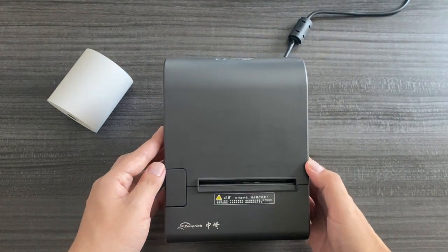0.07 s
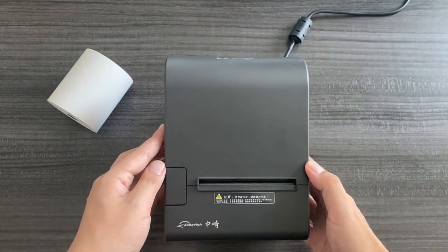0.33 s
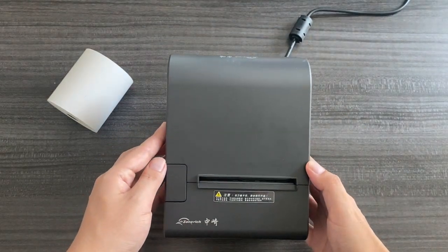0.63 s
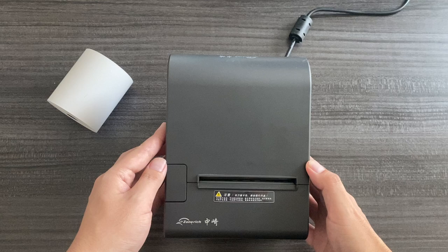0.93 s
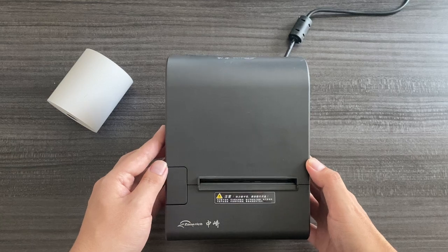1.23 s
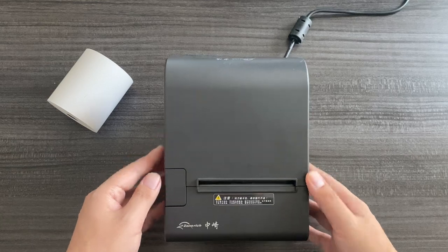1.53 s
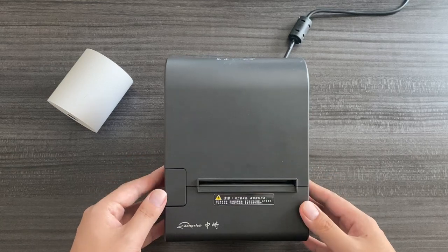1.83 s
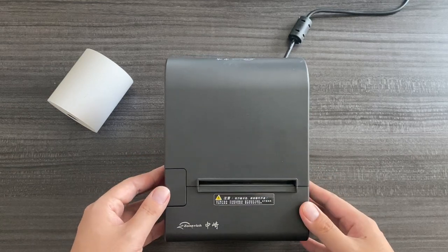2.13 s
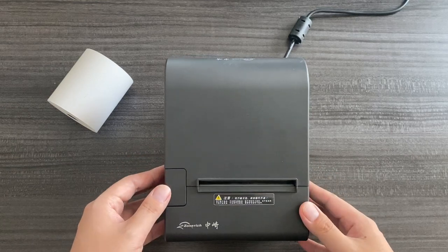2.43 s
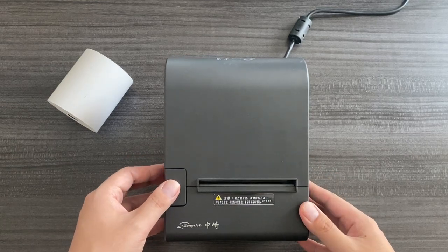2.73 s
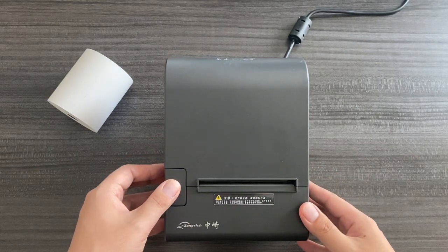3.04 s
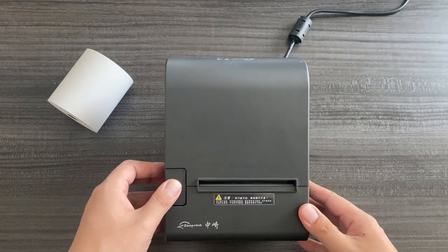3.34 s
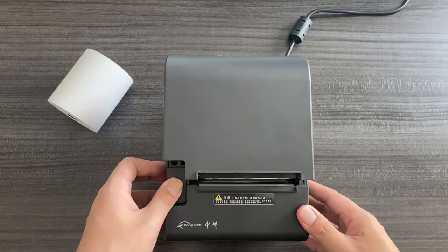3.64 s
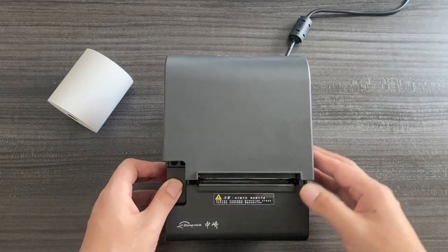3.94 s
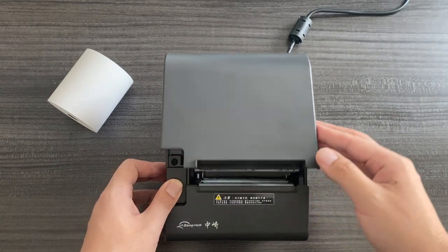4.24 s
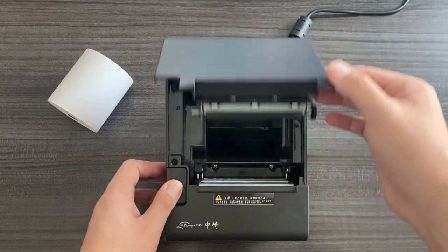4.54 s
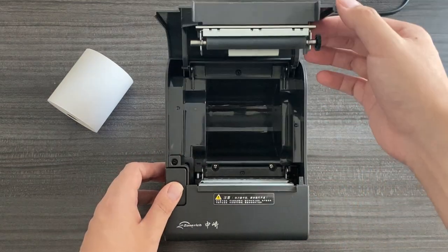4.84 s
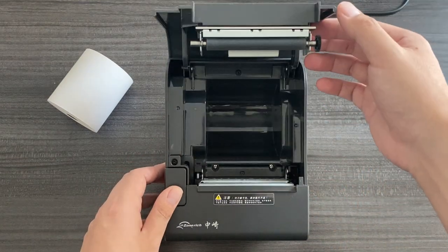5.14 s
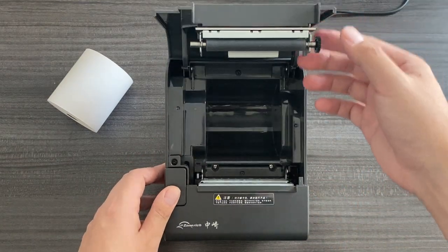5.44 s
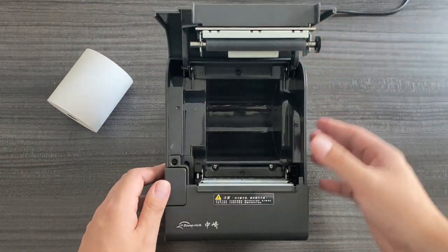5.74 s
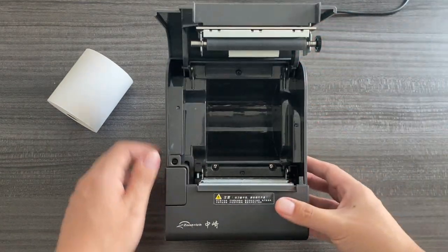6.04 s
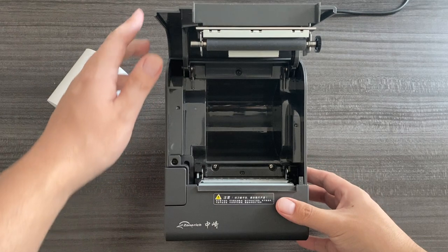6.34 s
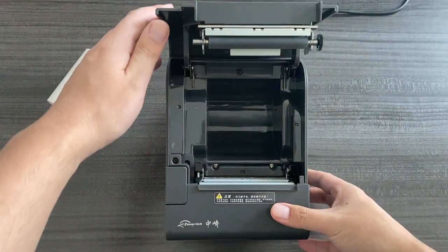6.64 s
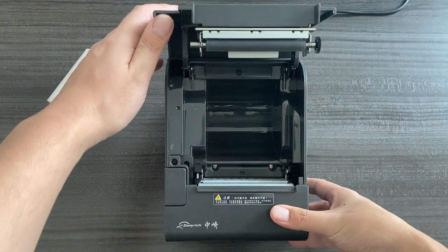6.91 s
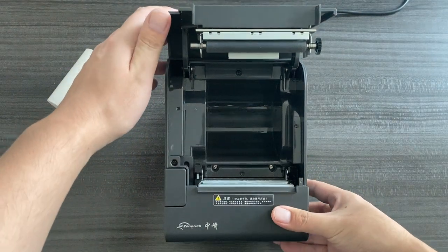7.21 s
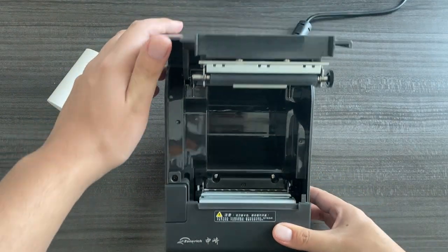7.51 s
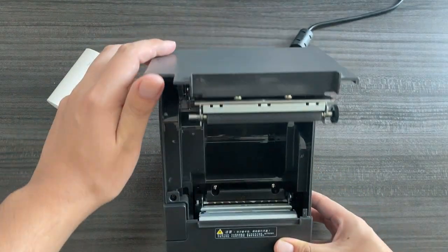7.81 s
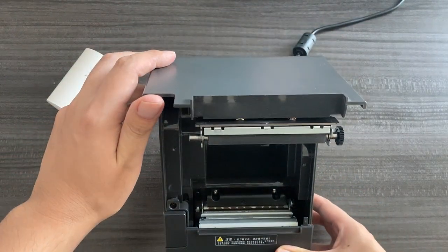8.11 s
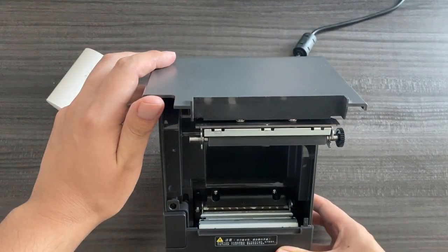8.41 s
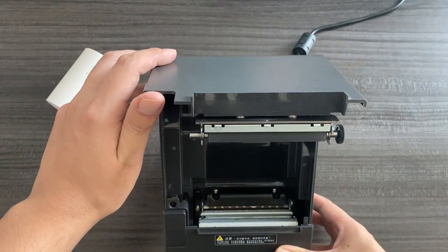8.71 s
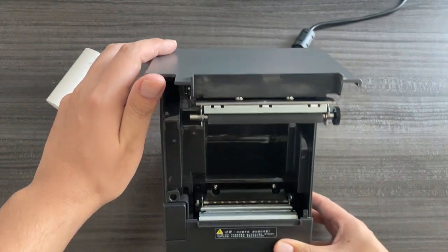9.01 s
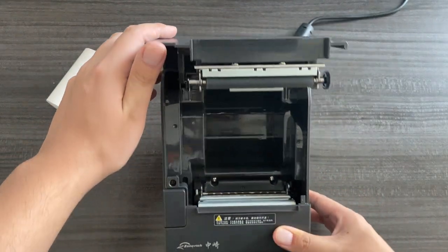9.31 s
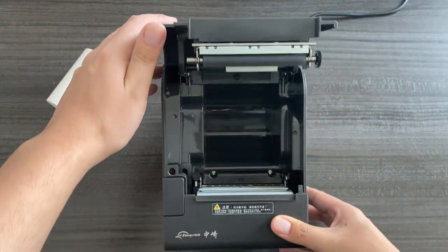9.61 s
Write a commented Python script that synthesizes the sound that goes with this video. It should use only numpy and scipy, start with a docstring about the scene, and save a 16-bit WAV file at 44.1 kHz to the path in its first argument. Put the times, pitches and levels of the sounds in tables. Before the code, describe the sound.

In a small room with a low steady hum, a plastic printer is shifted and set down on a wooden desk with a soft thump. Its latch creaks under pressure, then releases with a loud, hollow snap. The cover swings up with several sharp clicks and clacks against its stop. Quieter knocks, rubbing and hinge creaks follow as it is rocked, all heard from close by.

```python
"""A small room hums quietly, then hands shift a small plastic printer on a wooden desk with a thump.
They press its latch until the cover snaps free, swing the cover up against its stop and rock it on
the hinge. Every contact makes the hollow case ring, and heavy ones shake the desk. Strained parts
stick and slip, so they creak and scrape. Two close microphone openings pick up the sound."""
import sys
import numpy as np
from scipy import signal
from scipy.fft import rfft, irfft, next_fast_len
from scipy.io import wavfile

SR = 44100
rng = np.random.default_rng(int(sys.argv[2]) if len(sys.argv) > 2 else 0)


def store_wav(level_fs):
    """Save 16-bit WAV to argv[1]."""
    pcm = np.round(np.clip(np.atleast_2d(level_fs), -1, 1) * 32767)
    wavfile.write(sys.argv[1], SR, pcm.T.astype(np.int16))


N = 426006

# A "mode" is a note that an object rings at; its "ring time" is how long it takes to fade by 60 dB.
# "Likeness" is how alike left and right are: 0 is unrelated, 1 is the same.
# the tone of the quiet room's noise (frequency [Hz], relative level [dB])
AIR_COLOUR = [(20, -37), (35, -8), (55, 0), (90, -7.5), (140, -5.5), (300, -12.5), (440, -16.5),
              (620, -27.5), (780, -25.5), (1300, -34.5), (2500, -48.5), (4200, -54), (5100, -48),
              (6000, -56.5), (16000, -70.5)]
# the boost of the thin hiss over the rumble (time [s], gain [dB])
HISS_BOOST = [(0, 6), (3, 3.5), (6, 5), (8.2, 0), (9.6, 0)]
# the notes of the hum (frequency [Hz], level [dB])
HUM_NOTES = [(120, -54), (52, -63)]
# how long the room echoes (frequency [Hz], ring time [s])
ECHO_TIMES = [(100, 1), (500, 0.8), (1400, 0.71), (3700, 0.67), (8000, 0.51), (15000, 0.6)]
# how alike both sides are, for room noise and for echoes (frequency [Hz], likeness [0-1])
AIR_LIKENESS = [(30, 1), (400, 0.82), (700, 0), (2000, 0.14), (6000, 0), (7000, 1), (16000, 1)]
ECHO_LIKENESS = [(100, 0.99), (550, 0.72), (1000, 0.15), (3000, 0.15), (5500, 0.38), (7000, 1), (16000, 1)]

# rubbing strokes (time [s], length [s], level [dB])
GRIPS = [(6.45, 0.14, -53), (7.55, 0.39, -56), (9.2, 0.13, -60.5)]  # the hand's grip working against the cover
CREAKS = [(2.85, 0.39, -59), (3.18, 0.3, -52), (4.12, 0.45, -63.5), (4.79, 0.084, -52.5),
          (7.33, 0.078, -54.5), (9.25, 0.46, -69)]  # plastic parts dragging under load
SLIDES = [(2.385, 0.13, -67), (4.81, 0.058, -58.5), (6.79, 0.073, -78), (6.96, 0.15, -83.5)]  # fingers sliding over the case
SCRAPES = [(1.47, 0.31, -78.5), (6.805, 0.03, -70), (6.955, 0.14, -73), (7.5, 0.044, -71.5)]  # gritty scraping of the feet on the desk and of the hinge pins
GROANS = [(4.15, 0.045, -57.5), (6.812, 0.025, -49.5), (7.04, 0.11, -49), (9.33, 0.073, -61)]  # the hinge groaning as the cover turns
SCUFFS = [(4.808, 0.049, -51), (4.884, 0.014, -48), (5.578, 0.035, -54.5), (6.482, 0.038, -62.5),
          (7.255, 0.017, -62.5), (9.319, 0.019, -62), (9.345, 0.041, -74), (9.508, 0.018, -65.5)]  # fingertips brushing the open cover
# the tone of each kind of rubbing (frequency [Hz], relative level [dB])
GRIP_COLOUR = [(40, -27), (110, -2), (250, 2), (400, -10), (700, -21), (2000, -41), (16000, -100)]
CREAK_COLOUR = [(150, -22.5), (350, 7.5), (560, 4), (950, -7), (1400, -20.5), (2500, -23), (5000, -36),
                (16000, -54)]
SLIDE_COLOUR = [(500, 3), (2000, 4), (4500, 0.5), (7500, -7), (11000, -17), (16000, -29)]
SCRAPE_COLOUR = [(500, -3), (2000, 5.5), (5000, -6), (7800, -7), (11300, -4.5), (13000, -13.5),
                 (16000, -18)]
GROAN_COLOUR = [(300, -5), (450, 18.5), (650, 1.5), (850, -0.5), (1100, -2.5), (1400, -7.5), (1650, -9),
                (2000, -7.5), (2800, -19), (3600, -23), (6000, -37), (16000, -27)]
SCUFF_COLOUR = [(200, 3), (600, 1), (1000, 0), (1400, -3), (2000, -7), (3100, -19.5), (6000, -57),
                (16000, -46)]

# modes (frequency before tuning [Hz], relative level [dB], ring time [s])
SWAY_MODES = [(151, 5.5, 0.46), (215.5, -9.5, 0.75)]  # the printer swaying on its rubber feet
DESK_MODES = [(59.6, -12.5, 0.43), (72, -5.5, 0.34), (122.2, 2, 0.19), (155.5, -4.5, 0.25),
              (210.3, -6, 0.19), (247.3, -3.5, 0.26), (302, -8, 0.17), (361.8, -2.5, .16), (447, -10, 0.12),
              (498, -3.5, 0.12)]  # the desk top with the printer on it
CASE_MODES = [(365, -3, 0.12), (470, -2.5, 0.042), (536, -4, 0.39), (677, -16, 0.083), (703, -7, 0.078),
              (773, -8, 0.082), (900, -8, 0.097), (975, -1.5, 0.21), (1010, -4.5, 0.2),
              (1280, -16.5, 0.056), (1450, -3.5, 0.092), (1640, -5, 0.033), (1800, -5.5, 0.077),
              (1954, -4.5, 0.04), (2404, -9, 0.06), (2784, -6.5, 0.04), (3300, -6, 0.085),
              (3535, -3.5, 0.053), (4190, -9, 0.082), (4340, -12, 0.1), (7540, -5.5, 0.076)]  # the clear notes of the hollow case
COVER_MODES = [(343, -8.5, 0.14), (515.6, 1, 0.16), (701, -11, 0.19), (955, -20.5, 0.12)]  # the deep notes of the closed cover
# the overall tone of the case's many crowded modes (frequency [Hz], relative level [dB])
CASE_COLOUR = [(250, 1), (550, 0), (1000, 4), (1300, -1), (1650, 0), (2100, 0.5), (2700, 3.5), (4800, -1),
               (6200, -0.5), (7800, 11.5), (10500, -0.5), (12000, 2.5), (14200, -4), (15300, -2.5)]
# the case's bands, low to high (bottom [Hz], top [Hz], gain [dB], ring time of crowded modes [s],
# likeness [0-1], gain into the room [dB])
CASE_BANDS = [(296.3, 740, -1.5, 0.055, 0.3, -5), (730, 2060, -2.5, 0.063, 0.93, -3),
              (1880, 5230, 0, 0.05, 0.93, -2.5), (5070, 7800, -5.5, 0.016, 0.8, -13.5),
              (9000, 16000, -0.5, 0.029, 1, -10.5)]

# the printer's weight landing on the desk (time [s], level [dB], strongest push at [Hz])
THUMPS = [(1.183, -43, 290), (1.455, -34, 229), (1.463, -32, 128), (3.519, -30, 308), (3.546, -33, 55),
          (3.55, -36.5, 179.8), (4.44, -43.5, 134), (4.584, -38.5, 380), (4.59, -44.5, 142),
          (4.775, -39, 370), (4.823, -40, 127), (6.829, -41.5, 149), (6.968, -39, 152), (7.044, -47, 127),
          (7.512, -41, 129)]
# struck panels and small parts, and two brief high tones at 9.26 s (time [s], level [dB], frequency before
# tuning [Hz], ring time [s])
PINGS = [(1.178, -57, 1830, .05), (1.18, -51, 990, .06), (1.181, -34, 508, 0.056), (1.182, -33, 310, 0.055),
         (1.202, -35, 320, 0.035), (1.179, -79, 3330, .05), (1.449, -47, 1068, .05),
         (1.448, -51.5, 1852, 0.06), (1.448, -61, 2430, 0.034), (1.448, -63, 3280, 0.022),
         (3.308, -40.5, 977, 0.06), (3.503, -34, 890, 0.049), (3.515, -31, 2840, 0.0071),
         (3.514, -30, 937, 0.016), (4.412, -44, 1683, 0.085), (4.411, -40.5, 920, 0.039),
         (4.412, -57, 3150, 0.1), (4.577, -34.5, 1870, 0.023), (4.575, -39.5, 810, 0.063),
         (4.577, -44, 995, .06), (4.577, -34, 530, 0.076), (4.769, -39.5, 810, .06),
         (4.769, -45.5, 1240, 0.033), (4.772, -43, 1480, 0.055), (4.773, -34.5, 355, 0.08),
         (4.846, -52, 3200, 0.037), (4.888, -50, 2070, 0.023), (5.2, -50.5, 2560, 0.023),
         (5.201, -48, 1003, 0.083), (5.586, -48.5, 971, .03), (6.794, -54, 678, 0.025),
         (4.176, -55.5, 720, .06), (6.96, -40, 378, 0.052), (7.113, -46, 670, .05),
         (7.354, -42.5, 809, 0.029), (7.355, -42, 535, 0.23), (9.256, -66, 4290, 0.0056),
         (9.255, -62.5, 2300, 0.0075)]
# contacts that ring the case (time [s], base level [dB], treble slope [dB per octave])
CLICKS = [(1.446, -48, -7.5), (2.855, -52, -11), (3.309, -35.5, -5), (3.487, -42, -6.5), (3.497, -36, -5),
          (3.503, -40, -1.5), (3.5146, -26.5, -1), (3.521, -30, -2.5), (3.538, -43.5, 2.5),
          (3.544, -30.5, -0.8), (3.55, -37.5, -2.5), (3.589, -42, -1.5), (4.056, -50, 0),
          (4.209, -46.5, -5), (4.41, -44.5, 1.2), (4.419, -44, -8), (4.515, -56.5, -1.5),
          (4.574, -33.5, -4), (4.769, -35, -6), (4.823, -48.5, 0), (4.845, -52, -0.5),
          (4.873, -43.5, -14.5), (4.89, -53, -6), (5.199, -40.5, -7.5), (5.282, -53.5, -11),
          (6.502, -68, 0), (6.736, -64, -3), (7.566, -58, 0.5), (7.907, -58.5, -1.4), (9.256, -60.5, -1)]  # hard clicks of the latch, hinge and cover stop
KNOCKS = [(1.179, -50, -9), (1.185, -56, -18), (1.201, -56.5, -15), (1.456, -52.5, -11), (1.557, -65, -1.5),
          (2.93, -54, -3), (3.045, -78, -4), (3.107, -68, -10.5), (3.169, -59, -7.5), (3.206, -58.5, -18),
          (3.236, -61.5, -23), (3.268, -51.5, -13), (3.302, -57, -1.5), (3.335, -59, -13), (3.37, -51, -10),
          (3.468, -50.5, -5.5), (6.794, -60, -14.5), (6.818, -67, -11), (6.829, -66.5, -6),
          (6.955, -57.5, -1.5), (6.961, -54, -11.5), (7.01, -67, -1.5), (7.049, -58, -6.5),
          (7.084, -73, -7), (7.113, -56, -7.5), (7.121, -63, -16), (7.138, -65, -8.5), (7.354, -55, -4.5)]  # the case knocking as it shifts under the hands, and the ticks of parts that slip as they creak
# the sprung latch throwing and catching the cover (time [s], level [dB], wait until the catch [s])
CLUNKS = [(3.5148, -17.5, 0.034), (3.5434, -22, .012)]

# timing between the two microphone openings (frequency [Hz], lead of the left [radians])
MIC_PHASE = [(0, 0), (300, -.1), (700, .5), (3200, 1), (4500, .1), (7000, 0), (9000, -3.14), (10900, -6.28),
             (11500, -6.28), (13200, -9.42), (15000, -12.57)]
# their balance (frequency [Hz], left minus right [dB])
MIC_BALANCE = [(50, -0.5), (250, -1.2), (500, -0.5), (1000, 0.2), (2000, 1.3), (5000, 3), (8000, 0)]


def gain_of(db):
    """Turns decibels into a number to multiply by."""
    return 10 ** (np.asarray(db) / 20)


def evened(x):
    """Scales a sound to an average strength (rms) of 1."""
    return x / np.sqrt(np.mean(x ** 2) + 1e-20)


def curve_at(points, hz):
    """Reads between (frequency, value) points on a log-frequency axis."""
    f, value = np.transpose(points)
    return np.interp(np.log(hz + 1), np.log(f + 1), value)


def add(mix, s, sound):
    """Adds a sound to the mix, starting at s seconds."""
    part = mix[:, round(s * SR):][:, :sound.shape[-1]]
    part += sound[..., :part.shape[1]]


def coloured(x, colour):
    """Shapes a sound's tone with a (frequency, level) curve."""
    count = next_fast_len(x.shape[-1] + SR // 20)
    gains = gain_of(curve_at(colour, np.fft.rfftfreq(count, 1 / SR)))
    return irfft(rfft(x, count) * gains, count)[..., :x.shape[-1]]


def paired(two, likeness):
    """Blends two unrelated signals into a left and right of the given likeness."""
    likeness = np.clip(likeness, 0, 1)
    shared, apart = np.sqrt((1 + likeness) / 2) * two[0], np.sqrt((1 - likeness) / 2) * two[1]
    return np.array([shared + apart, shared - apart])


def ring(modes, t, tuning, spread_db, detune):
    """Fading sine waves; each blow lands differently, so levels and pitches can vary by chance."""
    hz, db, ring_s = np.transpose(modes)[:, :, None]
    weight, shift = rng.standard_normal((2, len(hz), 1))
    envelope = gain_of(db + spread_db * weight - 60 * t / ring_s)
    return (envelope * np.sin(2 * np.pi * hz * tuning * (1 + detune * shift) * t)).sum(0)


def background(air_db=-51.5, hiss_hz=1200, waver=0.27, waver_hz=6):
    """The room's low rumble, a hiss that slowly changes level, and a hum that wavers."""
    hz, t = np.fft.rfftfreq(N, 1 / SR), np.arange(N) / SR
    noise = irfft(paired(rfft(rng.standard_normal((2, N))), curve_at(AIR_LIKENESS, hz)), N)
    air = gain_of(air_db) * evened(coloured(noise, AIR_COLOUR))
    hiss = irfft(rfft(air) * hz ** 2 / (hz ** 2 + hiss_hz ** 2), N)
    out = air - hiss + hiss * gain_of(np.interp(t, *np.transpose(HISS_BOOST)))
    for hum_hz, db in HUM_NOTES:
        drift = evened(irfft(rfft(rng.standard_normal(N)) * (hz < waver_hz), N))
        out += gain_of(db) * evened((1 + waver * drift) * np.sin(2 * np.pi * hum_hz * t))
    return out


def echo_pattern(delay_s=0.0013, early_db=3, early_s=0.024):
    """Crowded echoes, strongest at first from the desk; each band fades at its own speed."""
    t = np.arange(SR) / SR
    echoes = rng.standard_normal((2, SR)) * (rng.random((2, SR)) < .15)
    echoes *= np.clip(t / delay_s - 1, 0, 1) * (1 + gain_of(early_db) * np.exp(-t / early_s))
    hz, when, bands = signal.stft(echoes, SR, nperseg=256)
    bands = paired(bands, curve_at(ECHO_LIKENESS, hz)[:, None])
    fade = gain_of(-60 * when / curve_at(ECHO_TIMES, hz)[:, None])
    tail = signal.istft(bands * fade, SR, nperseg=256)[1]
    return tail / np.linalg.norm(tail[0])


def room_echoes(x, patterns=4, changes_per_s=5.3):
    """Hands and cover keep moving, so one pattern of echoes blends into the next."""
    turn = np.arange(N) / SR * changes_per_s
    out = np.zeros((2, N))
    for k in range(patterns):
        apart = abs((turn - k) % patterns - patterns / 2)
        share = np.sqrt(np.maximum(1 - apart, 0))
        out += signal.oaconvolve(x * share, echo_pattern(), axes=1)[:, :N]
    return out


def rubbing(strokes, colour, slips_per_s, smooth, peak_at, slip_s=.004):
    """Parts stick and slip in tiny rasps over a smooth rub; each stroke swells, then fades."""
    out = np.zeros((2, N))
    slips = rng.exponential(1, N) * (rng.random(N) < slips_per_s / SR)
    fading_slips = signal.lfilter([1], [1, -np.exp(-1 / (slip_s * SR))], slips)
    rasps = evened(fading_slips * rng.standard_normal(N))
    rub = rasps + smooth * paired(rng.standard_normal((2, N)), likeness=0.78)
    for s, length, db in strokes:
        stroke = coloured(rub[:, round(s * SR):round((s + length) * SR)], colour)
        swell = np.interp(np.linspace(0, 1, stroke.shape[1]), [0, peak_at, 1], [0, 1, 0])
        add(out, s, gain_of(db) * evened(stroke * np.sqrt(swell)))
    return out


def printer_sway(start_s=1.485, db=-32.5, rise_s=0.0013):
    """Once set down, the printer bobs on its rubber feet with a low, slowly fading note."""
    t, out = np.arange(SR // 2) / SR, np.zeros((2, N))
    sound = ring(SWAY_MODES, t, tuning=0.94, spread_db=2.0, detune=0.0042) * (1 - np.exp(-t / rise_s))
    add(out, start_s, gain_of(db) * sound / np.std(sound[:SR // 40]))
    return out


def desk_thumps(rise_s=0.00079, width_octaves=0.54):
    """The rubber feet pass a soft push to the desk; a firmer push favours its higher modes."""
    t, out = np.arange(SR // 2) / SR, np.zeros((2, N))
    hz, mode_db, ring_s = np.transpose(DESK_MODES)
    for s, db, push_hz in THUMPS:
        favour_db = -10 * np.log10(1 + np.abs(np.log2(hz / push_hz) / width_octaves) ** 4)
        modes = np.column_stack([hz, mode_db + favour_db, ring_s])
        sound = ring(modes, t, tuning=0.97, spread_db=3.0, detune=0.021) * (1 - np.exp(-t / rise_s))
        add(out, s, gain_of(db) * sound / np.std(sound[:SR // 40]))
    return out


def panel_pings(rise_s=0.00088, split=0.099, partner_db=-8):
    """Each ping rings briefly on two nearby notes; most are a panel or small part hit directly."""
    t, out = np.arange(SR // 6) / SR, np.zeros((2, N))
    for s, db, hz, ring_s in PINGS:
        pair = [(hz * (1 - split), partner_db, ring_s / 2), (hz, 0, ring_s)]
        sound = ring(pair, t, tuning=0.99, spread_db=1.5, detune=0.0036) * (1 - np.exp(-t / rise_s))
        add(out, s, gain_of(db) * sound / np.std(sound[:SR // 100]))
    return out


def case_hit(level_db, slope_db, hollow_db, rise_s=0.0028, crack_s=.0052, pivot_hz=1080):
    """One hit cracks and rings the case's modes; returns the direct sound and the room's share."""
    t = np.arange(SR // 4) / SR
    onset = 1 - np.exp(-(t / rise_s) ** 2)  # the parts scrape before they settle
    crack = gain_of(4) * np.exp(-(t / crack_s) ** 2)
    pulse = coloured(signal.unit_impulse(len(t), SR // 500), CASE_COLOUR)
    # heavy blows, from about -28 dB, set the whole case ringing; light ones stay a dry clack
    clear_db = -10 + 1.25 * (level_db + hollow_db + 28)
    clear = gain_of(clear_db) * ring(CASE_MODES, t, tuning=1.0, spread_db=5.5, detune=0.007)
    direct, to_room = np.zeros((2, 2, len(t)))
    for k, (low, high, band_db, ring_s, likeness, room_db) in enumerate(CASE_BANDS):
        # the lowest band sets how hollow the hit sounds; the others follow the treble slope
        colour_db = slope_db * np.log2(np.sqrt(low * high) / pivot_hz) if k else hollow_db
        noise = paired(rng.standard_normal((2, len(t))), likeness)
        crowded = coloured(noise * (crack + gain_of(-60 * t / ring_s)), CASE_COLOUR)
        band = signal.butter(3, [low, high], "band", fs=SR, output="sos")
        sound = signal.sosfilt(band, (crowded + clear) * onset)
        start_strength = np.sqrt(np.mean(sound[:, :SR // 125] ** 2))
        sound *= gain_of(level_db + band_db + colour_db) / start_strength
        direct += sound
        # the room gathers sound from all directions, which evens out most of the peaks
        gathered = evened(signal.sosfilt(band, pulse)) + gain_of(-7) * evened(sound)
        to_room += gain_of(room_db) * np.std(sound) * evened(gathered)
    return direct, to_room


def clicks_and_knocks(click_hollow_db=-0.5, knock_hollow_db=11, heavy_db=-31.5, lead_s=.0017):
    """A click moves one small part; a knock moves the whole case, so it sounds more hollow."""
    direct, to_room = np.zeros((2, 2, N))
    for hits, hollow_db in (CLICKS, click_hollow_db), (KNOCKS, knock_hollow_db):
        for s, level_db, slope_db in hits:
            shake_db = 0.2 * max(level_db - heavy_db, 0)  # a heavy hit shakes the case too
            near, far = case_hit(level_db, slope_db, hollow_db + shake_db)
            add(direct, s - lead_s, near)
            add(to_room, s - lead_s, far)
    return direct, to_room


def cover_clunks(rise_s=.0015, catch_db=-15, catch_db_per_s=-2500):
    """The freed spring bends the cover, which rings with a hollow note until the catch muffles it."""
    t, out = np.arange(SR // 3) / SR, np.zeros((2, N))
    for s, db, catch_s in CLUNKS:
        muffling = gain_of(np.clip((t - catch_s) * catch_db_per_s, catch_db, 0))
        note = ring(COVER_MODES, t, tuning=0.99, spread_db=3.5, detune=0)
        sound = note * (1 - np.exp(-t / rise_s)) * muffling
        add(out, s, gain_of(db) * sound / np.std(sound[:SR // 100]))
    return out


def scene():
    """Mixes the printer's sounds with their echoes and the room's background."""
    hits, hits_to_room = clicks_and_knocks()
    clunks, pings = cover_clunks(), panel_pings()
    thuds = desk_thumps() + rubbing(GRIPS, GRIP_COLOUR, slips_per_s=65, smooth=0.59, peak_at=0.31)
    rubs = rubbing(CREAKS, CREAK_COLOUR, slips_per_s=130, smooth=0.28, peak_at=0.7)
    rubs += rubbing(SLIDES, SLIDE_COLOUR, slips_per_s=210, smooth=2.4, peak_at=0.14)
    rubs += rubbing(SCRAPES, SCRAPE_COLOUR, slips_per_s=270, smooth=0.38, peak_at=0.16)
    rubs += rubbing(GROANS, GROAN_COLOUR, slips_per_s=250, smooth=0.29, peak_at=0.55)
    rubs += rubbing(SCUFFS, SCUFF_COLOUR, slips_per_s=890, smooth=0.57, peak_at=0.12)
    direct = hits + clunks + pings + thuds + printer_sway() + rubs
    to_room = hits_to_room + gain_of(-21) * clunks + gain_of(-13) * pings
    to_room += gain_of(-4.5) * thuds + gain_of(-3.5) * rubs
    return direct + room_echoes(to_room) + background()


def record(dry, low_cut_hz=34, high_cut_hz=15800):
    """The two microphone openings differ in timing and level; the lowest and highest sounds are cut."""
    hz = np.fft.rfftfreq(N, 1 / SR)
    lead = np.interp(hz, *np.transpose(MIC_PHASE))
    half_difference = np.exp(.5j * lead) * gain_of(curve_at(MIC_BALANCE, hz) / 2)
    sides = irfft(rfft(dry) * np.array([half_difference, 1 / half_difference]), N)
    low_cut = signal.butter(6, low_cut_hz, "high", fs=SR, output="sos")
    high_cut = signal.firwin(301, high_cut_hz, window=("kaiser", 9), fs=SR)
    return signal.oaconvolve(signal.sosfilt(low_cut, sides), high_cut[None], "same", axes=1)


dry = scene()
out = record(dry)
store_wav(out)
```